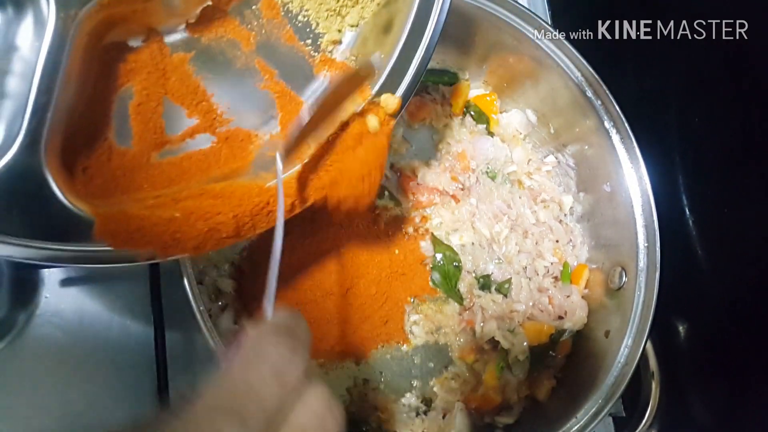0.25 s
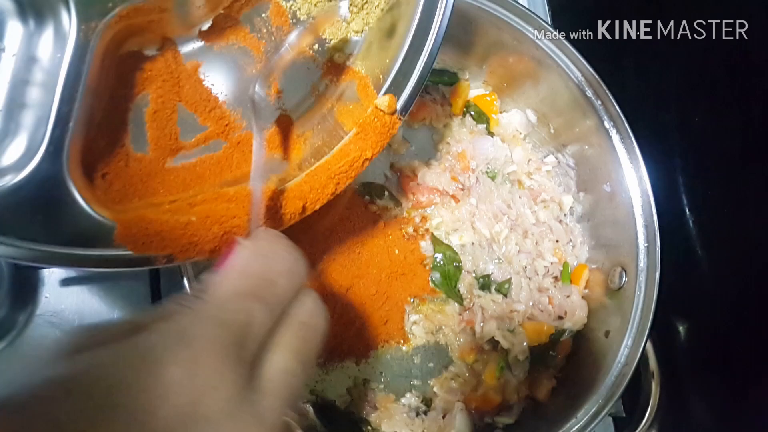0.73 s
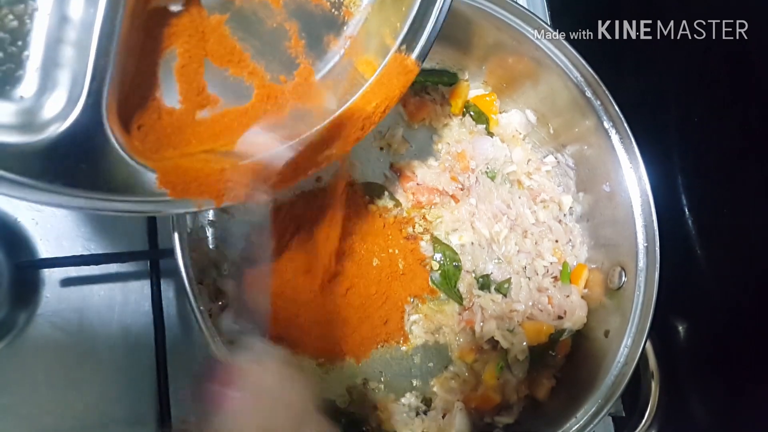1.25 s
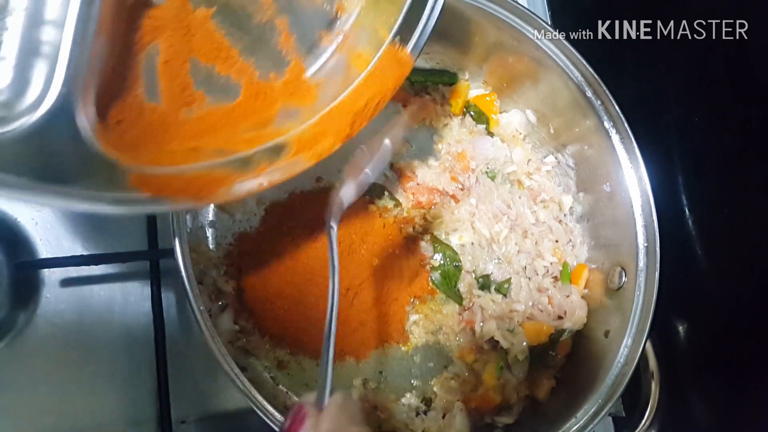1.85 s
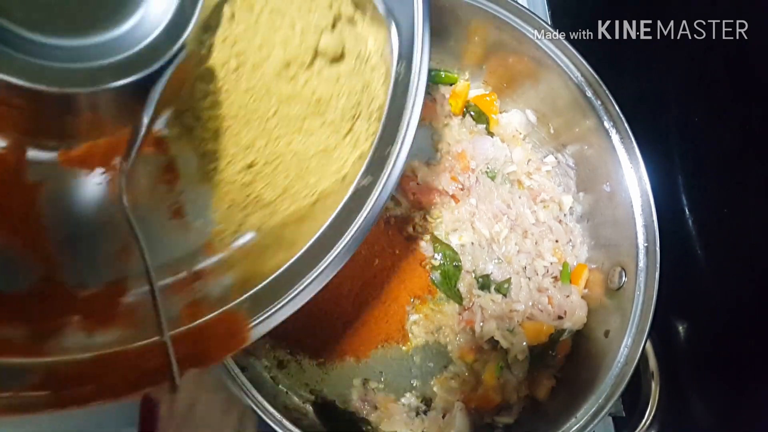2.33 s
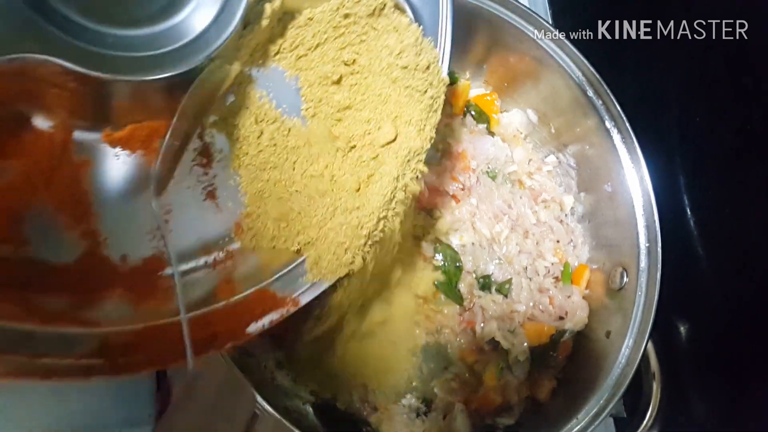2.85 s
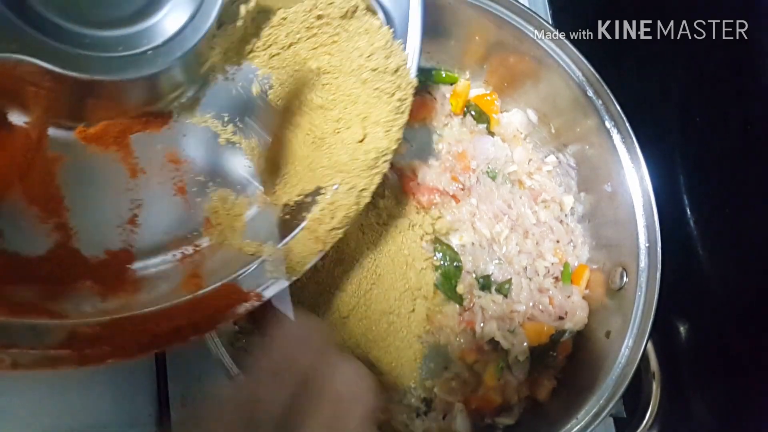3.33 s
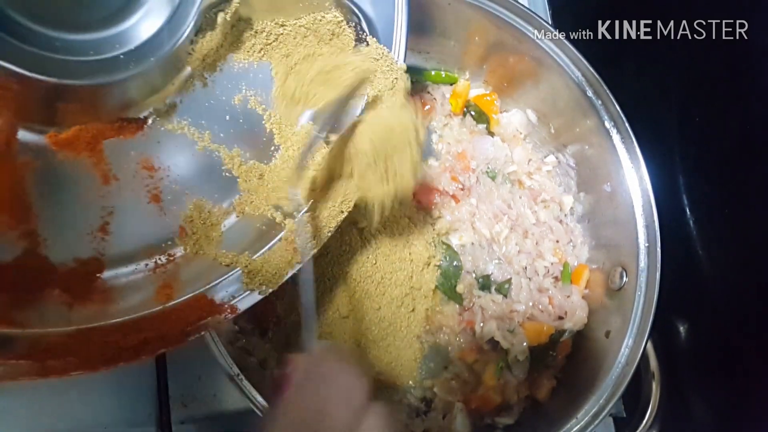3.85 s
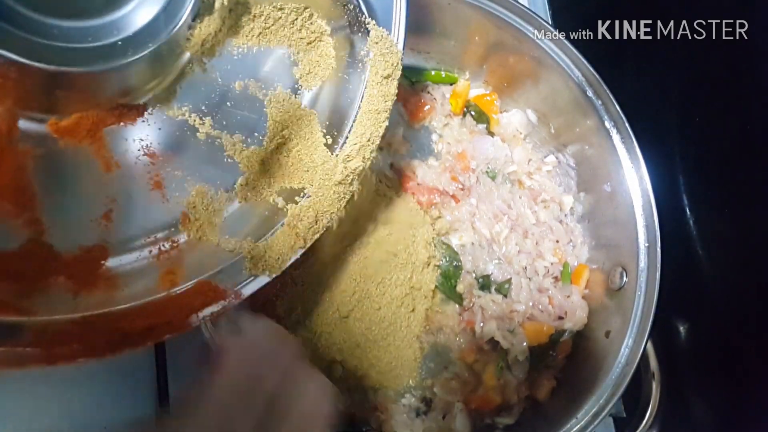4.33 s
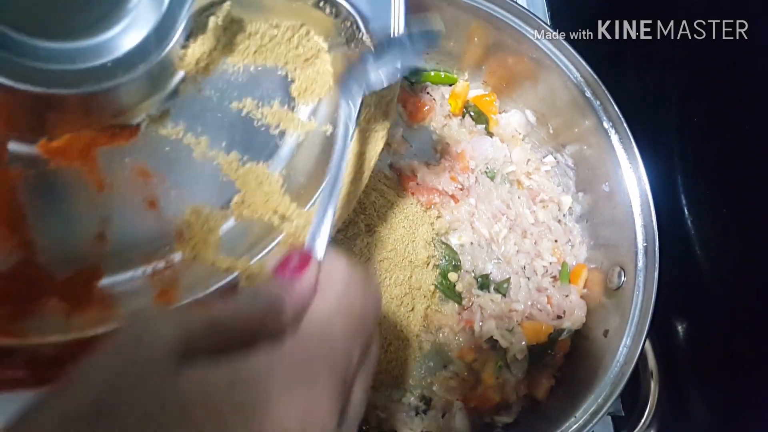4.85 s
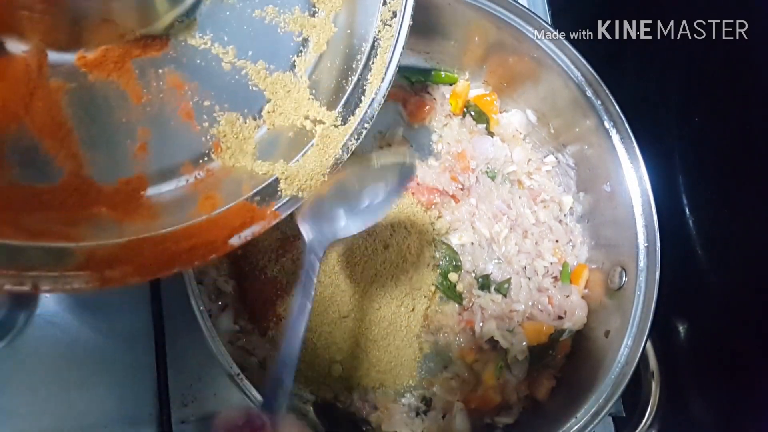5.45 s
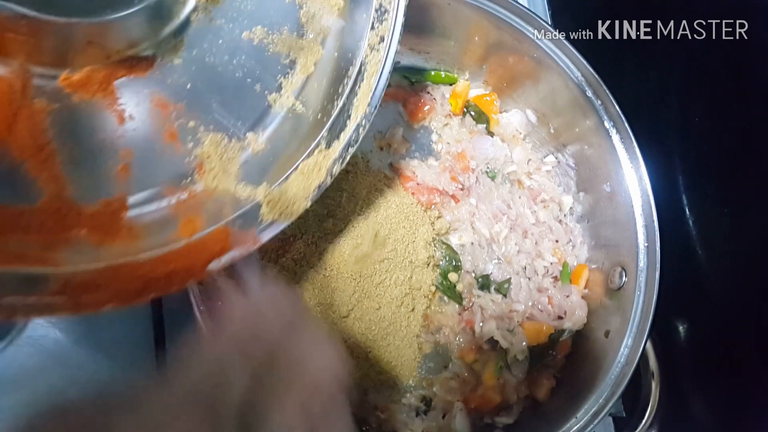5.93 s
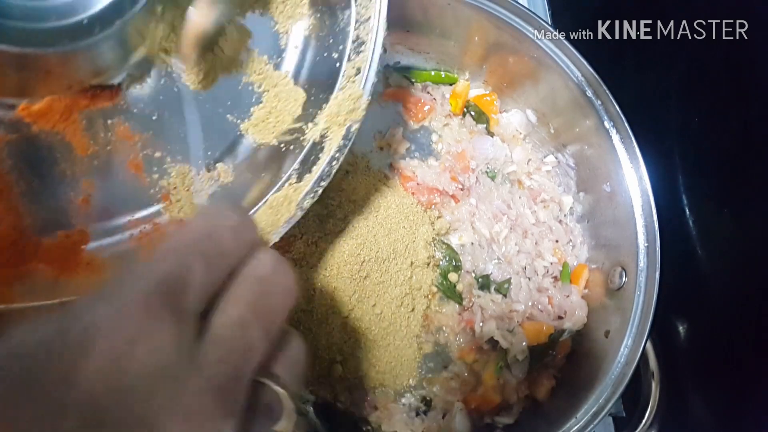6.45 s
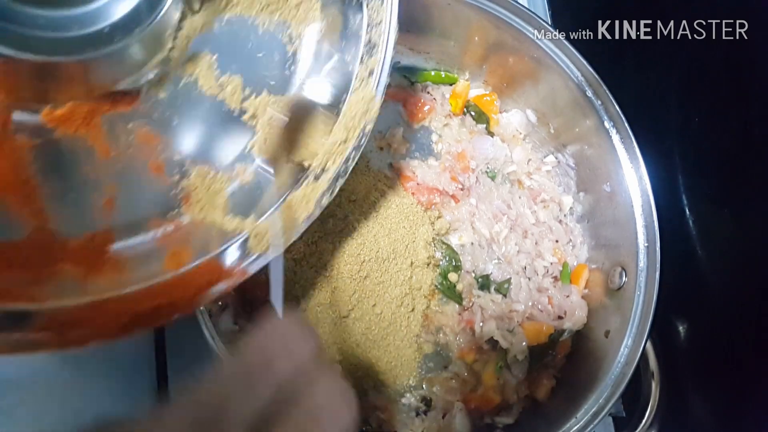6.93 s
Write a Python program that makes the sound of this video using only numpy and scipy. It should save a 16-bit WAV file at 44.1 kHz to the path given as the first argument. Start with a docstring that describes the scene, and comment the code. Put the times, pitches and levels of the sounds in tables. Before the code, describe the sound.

Close up in a small kitchen, a steel spoon works on a thin hand-held plate over quietly sizzling oil. Firm clanks at 0.2 and 0.55 seconds, then a softer one at 0.9, lead to a quick run from 1.2 to 1.85, with bright gritty scrapes and small oil pops around 1.4 to 1.5. From about 2 to 3 seconds it is calmer: the sizzle dips and only faint taps and slides are heard. Softer, duller knocks with powdery hiss follow at 3.0, 3.4 and 3.8. Clear ringing clanks return at 4.15 and, loudest, 4.55, then the plate knocks the pan at 4.67 with a hollow clunk. A longer scrape follows at 5.0. Uneven clinks and short scrapes continue at 5.45, 5.8, 6.2, 6.55 and 6.9, while the sizzle dips again slightly, then rises at the end. Rings are short and hand-damped, the room tail brief, the right side slightly louder.

```python
"""In a small kitchen a steel spoon lands on a hand-held steel plate and scrapes spice powder off it into a pan.
Blows and grit both ring the plate's modes, summed as decaying phasors; fine powder adds a grating noise hiss.
Once the plate knocks the pan. Oil below sizzles as shaped noise with crackle and spits as short pops.
A diffuse tail is the room; two spaced microphone ports hear it all from close by."""
import sys
import numpy as np
from scipy import signal
from scipy.fft import rfft, irfft
from scipy.io import wavfile
from scipy.ndimage import uniform_filter1d

SR = 44100
rng = np.random.default_rng(int(sys.argv[2]) if len(sys.argv) > 2 else 0)


def put_to_file(sound):
    """Save the sound as 16-bit audio at rate SR, in the file named by the first command-line argument."""
    columns = np.atleast_2d(sound).T  # one column per channel
    safe = np.clip(columns, -1, 1)
    whole_steps = np.round(safe * 32767)
    wavfile.write(sys.argv[1], SR, whole_steps.astype(np.int16))


N = 317079

LN_1000 = np.log(1000)  # 60 dB decay in nepers
PORT_SIGNS = np.array([[1], [-1]])  # left, right
PORT_SCATTER_RAD = 0.99  # phase spread at each port from spot to spot, full above 1500 Hz


def undb(db):
    """Amplitude ratio of a level in dB."""
    return 10 ** (np.asarray(db) / 20)


def unit(x):
    """Scales to rms 1."""
    return x / np.sqrt(np.mean(x ** 2))


def along(table, hz):
    """Reads (Hz, value) points on a log-frequency axis."""
    f, v = np.transpose(table)
    return np.interp(np.log(hz + 1), np.log(f), v)


def colour(x, table):
    """Shapes the spectrum by (Hz, dB) points; rms 1."""
    gain = undb(along(table, np.fft.rfftfreq(N, 1 / SR)))
    return unit(irfft(rfft(x) * gain, N))


def walk(rate_hz):
    """Random levels held 1 / rate_hz s and slewed twice."""
    k = int(SR / rate_hz)
    held = np.repeat(rng.standard_normal(N // k + 1), k)
    return 1.3 * uniform_filter1d(uniform_filter1d(held, k), k)[:N]


def grains(density_hz, spread_db):
    """Sparse clicks of scattered size."""
    size_db = spread_db * np.minimum(rng.exponential(size=N), 3)
    hits = rng.random(N) < density_hz / SR
    return hits * rng.standard_normal(N) * undb(size_db)


def add(out, x, s):
    """Mixes x into out from s seconds on."""
    i = int(s * SR)
    out[:, i:i + x.shape[1]] += x[:, :N - i]


def rings(modes, length_s):
    """Decaying phasors of the modes, and how the right port hears each: earlier, treble scrambled."""
    right_lead_s = .0002
    hz, db, t60_s = np.transpose(modes)
    t = np.arange(int(length_s * SR)) / SR
    rate = 2j * np.pi * hz - LN_1000 / np.maximum(t60_s, .01)
    z = undb(db)[:, None] * np.exp(np.outer(rate, t))
    scatter_rad = np.minimum(hz / 2500, 1.6) * rng.standard_normal(len(hz))
    right = np.exp(1j * (2 * np.pi * hz * right_lead_s + scatter_rad))
    return hz, t, z, np.array([np.ones(len(hz)), right])


def spot_phases(hz, ports):
    """Phase turns of each mode at each port, drawn anew for every contact spot."""
    spread_rad = PORT_SCATTER_RAD * np.minimum(hz / 1500, 1)
    return np.exp(1j * spread_rad * rng.standard_normal(ports.shape))


def sizzle():
    """Oil: thin crackle over burner and room noise; the bass is alike at both ports."""
    # noise and crackle colour: (frequency [Hz], gain [dB])
    spectrum = [(20, -24), (50, -18), (100, -6.5), (220, -6), (550, -7), (1400, -9.5), (3300, -9),
                (6300, -11), (7600, -17.5), (11000, -17.5), (16000, -26)]
    # sizzle level over time, sinking by about 7 dB from 2 to 3 s: (time [s], level [dB])
    swell_points = [(0, -43), (1.9, -44.5), (2.1, -51), (2.98, -49.5), (3.1, -43.5), (4.9, -44),
                    (5.3, -47.5), (6.0, -46.5), (7.19, -42.5)]
    # left-right likeness: (frequency [Hz], correlation [0-1])
    likeness = [(130, .97), (250, .94), (500, .75), (1400, .1), (16000, .02)]
    hz = np.fft.rfftfreq(N, 1 / SR)
    like = np.clip(along(likeness, hz), 0, 1)
    bubble = hz / np.hypot(hz, 1500)  # tiny bubbles have no bass

    def source():
        noise = rfft(rng.standard_normal(N))
        return noise + .5 * bubble * rfft(unit(grains(300, 5.0)))

    mid, side = source(), source()
    pair = irfft(mid * np.sqrt(1 + like) + side * np.sqrt(1 - like) * PORT_SIGNS, N)
    s, db = np.transpose(swell_points)
    swell_db = np.interp(np.arange(N) / SR, s, db) + 1.0 * walk(8.1)
    return colour(pair, spectrum) * undb(swell_db)


def plate_modes():
    """The plate's strong modes plus a crowd of weak, quickly damped ones: (Hz, dB, free t60 s)."""
    # strong modes: (frequency [Hz])
    strong_hz = [887, 1124, 1230, 1385, 1464, 1556, 1666, 1814, 1963, 2266, 2342, 2572, 2885, 2968, 3127,
                 3288, 3517, 3747, 3850, 4135, 4581, 5160, 5669, 6309, 7219]
    # strong modes: (level [dB])
    strong_db = [-11, -9.5, -13.5, -11.5, -14.5, -17, -11, -10, -12.5, -9, -8.5, -8.5, -16, -6, -15.5, -11,
                 -9.5, -8, -17, -20, -10, -11.5, -11, -13.5, -21]
    strong_t60_s, crowd_t60_s, crowd = .3, .13, 70
    hz = 450 + 9000 * np.linspace(0, 1, num=crowd) ** 1.3 * (1 + 0.0073 * rng.standard_normal(crowd))
    db = along([(450, -31.5), (850, -15.5), (1300, -15.5), (3500, -12.5), (9500, -29)], hz)
    db = db + 2 * rng.standard_normal(crowd)
    strong = np.c_[strong_hz, strong_db, np.full(len(strong_hz), strong_t60_s)]
    return np.r_[strong, np.c_[hz, db, np.full(crowd, crowd_t60_s)]]


def blows(modes):
    """Each landing spot feeds the modes differently; the grip and the powder shorten the ring."""
    # spoon landings; colours are against the blow: (time [s], blow level [dB], lowest mode [dB],
    # brightness at 3 kHz [dB], thud [dB], ring length [share])
    landings = [(0.1904, -11, 4, -12, -9.5, 0.28), (0.5443, -10.5, 10.5, -7, -6, 0.5),
                (0.9158, -22, 18.5, -10, -0.5, 0.52), (1.2236, -14, 8.5, -9, -4.5, 0.58),
                (1.2563, -10.5, -1, -11.5, -15.5, 0.45), (1.5234, -11.5, 4.5, -12.5, -18, 0.49),
                (1.6108, -15, -20, -10, -15, 0.22), (1.8471, -10.5, 1.5, -0.5, -16, 0.75),
                (2.4464, -30, -17, 3, -11, 0.34), (3.0255, -19.5, 14, -14, 1.5, 0.26),
                (3.3978, -20.5, 9, -23, 3, 0.25), (3.7794, -27, -1.5, -11, 3, 0.91),
                (4.14, -11, 1, -11, -6.5, 0.7), (4.5423, -7.5, -3.5, -10, -8.5, 1),
                (4.9757, -12.5, -2, -5.5, -12, 0.76), (5.447, -22.5, 1, 1.5, -3.5, 0.3),
                (5.7954, -13, 6.5, -10.5, -6.5, 0.41), (6.1923, -22, -4, -15, -1.5, 0.24),
                (6.551, -14.5, -2.5, -12, 0, 0.49), (6.65, -22.5, -11, -12, -5.5, 0.43),
                (6.9048, -18, -18, 8, -2.5, 0.83)]
    treble_drop_db, tick_db = -5, -15  # 6 kHz modes and the tick, against the brightness
    out = np.zeros((2, N))
    hz, t, z, ports = rings(modes, 0.41)
    thud = np.exp(-t / 0.0019) * np.sin(2 * np.pi * 380 * t)
    for s, db, low_db, bright_db, thud_db, share in landings:
        tone_points = [(1300, 0.79), (2000, -2.7), (3000, bright_db), (6000, bright_db + treble_drop_db)]
        tone_db = along(tone_points, hz) + 3.4 * rng.standard_normal(len(hz))
        tone_db[0] = low_db
        feed = undb(tone_db) * spot_phases(hz, ports) * ports
        grip = np.exp(-LN_1000 * t / 0.2 * (1 / np.clip(share, .15, 3) - 1 / 3))
        lowest = np.outer(feed[:, 0], z[0]).imag * np.sqrt(grip)  # the fingers hold it near a node
        higher = (feed[:, 1:] @ z[1:]).imag * grip
        ring = (higher + lowest) * np.minimum(t / .0006, 1)
        # steel edge on steel
        tick = np.diff(rng.standard_normal((2, len(t) + 1))) * np.exp(-t / 0.0043)
        blow = undb(db) * ring + undb(db + thud_db) * thud
        add(out, blow + undb(db + bright_db + tick_db) * tick, s)
    return out


def strokes(modes):
    """Grit under the edge drives the plate, other modes as the contact travels; fine powder hisses."""
    # spoon slides; thin steel near the rim rings higher: (start [s], time until lift [s],
    # scrape at start [dB], scrape at lift [dB], powder hiss at lift [dB], tilt [dB/octave],
    # favoured modes [Hz], their gain [dB])
    slides = [(0.56, 0.05, -27, -28.5, -35.5, -1, 890, 7.8), (0.93, 0.084, -42, -37, -37, -3.5, 3150, 7),
              (1.27, 0.042, -23.5, -27.5, -34, -4, 1500, 4),
              (1.54, 0.077, -24.5, -24, -34.5, -3.5, 1720, 6),
              (1.86, 0.053, -21, -20.5, -36.5, -0.5, 3170, 4),
              (2.47, 0.12, -57, -42, -53, -1.5, 2200, 11.6),
              (2.63, 0.066, -41.5, -37.5, -40, 2.5, 3800, 5.3),
              (3.042, .058, -35.5, -33.5, -31.5, -3.5, 4460, 3.5),
              (3.408, 0.074, -37.5, -39, -56, -9, 1250, 9), (3.79, 0.016, -31, -34, -34, -6, 3120, 3.5),
              (3.86, 0.05, -42, -38.5, -46, -2.5, 3080, 4.8),
              (4.16, 0.092, -24, -30.5, -28, -1.3, 2270, 5.9),
              (4.299, 0.047, -38, -34, -37.5, -0.5, 3060, 6.5),
              (4.559, 0.055, -22, -28.5, -26.5, -1, 3820, 4.1), (4.99, .16, -22, -32, -32, 0, 3220, 5.9),
              (5.458, 0.093, -28.5, -34, -36.5, -1, 3190, 13), (5.808, 0.068, -28, -35, -30, -1, 1250, 11),
              (6.2, 0.021, -28, -34.5, -30, -2.5, 2380, 5.8),
              (6.569, 0.097, -27, -48, -40, -3.5, 1320, 5.2),
              (6.921, .045, -23.5, -26.5, -41, 0, 3020, 9.1)]
    # powder grain colour: (frequency [Hz], gain [dB])
    powder = [(300, -45), (2000, -19), (5500, -5.5), (7700, -16), (10900, -13.5), (16000, -29)]
    # the edge bites, then leaves the plate
    touch_s, lift_db_per_s, hiss_lift_db_per_s = .015, 269, 370
    hiss_growth_db = 8.5  # the hiss grows as the spoon gathers speed and powder
    grate_s = 0.0038  # decay of the small patch under the edge
    out = np.zeros((2, N))
    hz, t, z, ports = rings(modes, .2)
    grit = undb(2.23 * walk(60)) * unit(grains(2500, 4.1))
    dust = undb(2.94 * walk(90)) * np.array([colour(grains(3500, 4.8), powder) for _ in range(2)])
    for s, length_s, start_db, lift_db, hiss_db, tilt_db, sings_hz, favour_db in slides:
        now = np.arange(-touch_s, length_s + .12, 1 / SR)
        before, after = np.maximum(length_s - now, 0), np.maximum(now - length_s, 0)
        touch = np.minimum(1 + now / touch_s, 1)
        span = slice(int(s * SR), int(s * SR) + len(now))
        scrape_db = lift_db + (start_db - lift_db) * before / length_s - lift_db_per_s * after
        dust_db = hiss_db - hiss_growth_db * before / length_s - hiss_lift_db_per_s * after
        drive = touch * undb(scrape_db) * grit[span]
        hiss = touch * undb(dust_db) * dust[:, span]
        favoured = np.exp(-(np.log2(hz / sings_hz) / 0.13) ** 2)
        path_db = tilt_db * np.log2(hz / 2000) + favour_db * favoured
        # four contact places, crossfaded at equal power
        travel = np.minimum(np.arange(len(now)) / SR / (length_s + .06), 1) * 3
        for place in range(4):
            spot = undb(path_db + 2.56 * rng.standard_normal(len(hz)))
            spot = spot * np.exp(2j * np.pi * rng.random(len(hz)))
            turned = ports * spot_phases(hz, ports)
            body = ((spot * turned) @ z).imag * np.exp(-t / 0.012)  # the pressing spoon damps the plate
            patch = rng.standard_normal((2, len(t))) * np.exp(-t / grate_s)
            here = np.sqrt(np.maximum(1 - np.abs(travel - place), 0))
            for push, ring in (((drive * here)[None], body), (hiss * here, patch)):
                response = ring / np.sqrt(np.mean(ring ** 2) * len(t))  # unit energy
                add(out, signal.fftconvolve(push, response, axes=1), s - touch_s)
    return out


def spits():
    """Single drops bursting in the oil: a decaying sine each, a cycle or two long."""
    # bursts: (time [s], level [dB])
    drops = [(1.4164, -23.5), (1.4694, -24.5), (1.506, -21), (2.9446, -31), (3.2169, -22), (3.883, -24.5),
             (4.8045, -31), (5.3543, -28), (6.0723, -27.5)]
    out, t = np.zeros((2, N)), np.arange(300) / SR
    for s, db in drops:
        size, side = rng.standard_normal(2)
        pop_hz = 3300 * np.exp(.2 * size)
        pop = np.exp(-t / .0005) * np.sin(2 * np.pi * pop_hz * t)
        add(out, undb(db + 2 * side * PORT_SIGNS) * pop, s)
    return out


def pan_knock():
    """The plate's rim touches the pan and rings the pan's modes."""
    # pan modes: (frequency [Hz], level [dB], t60 [s])
    pan = [(215, -26, 0.57), (248, -29.5, 0.86), (500, -6.5, 0.035), (710, -20, 0.21), (804, -9, 0.093),
           (978, -8.5, 0.086), (1790, -12, 0.14)]
    # knocks: (time [s], level [dB])
    knocks = [(4.665, -14)]
    out = np.zeros((2, N))
    _, _, z, ports = rings(pan, 0.36)
    for s, db in knocks:
        add(out, undb(db) * (ports @ z).imag, s)
    return out


def kitchen(x):
    """Room echo: a short diffuse tail of decaying noise, different at each port."""
    t60_s, gap_s = .3, .003
    t = np.arange(int(.5 * SR)) / SR
    tail = rng.standard_normal((2, len(t))) * np.exp(-LN_1000 * t / t60_s) * (t > gap_s)
    tail = signal.lfilter([.5], [1, -.5], tail)  # softer treble
    return signal.fftconvolve(x, tail / np.sqrt(np.sum(tail[0] ** 2)), axes=1)[:, :N]


def scene():
    """Sums the near sources, their room tail and the sizzle."""
    room_db = -14
    modes = plate_modes()
    near = blows(modes) + strokes(modes) + spits() + pan_knock()
    # small, thin objects radiate little bass
    near = signal.sosfilt(signal.butter(2, 130, "highpass", fs=SR, output="sos"), near)
    return near + undb(room_db) * kitchen(near) + sizzle()


def record(dry):
    """The right port is the louder; tanh rounds the loudest peaks and a steep low-pass cuts the top."""
    right_over_left_db, top_hz = 2.0, 15900
    heard = dry * undb(-PORT_SIGNS * right_over_left_db / 2)
    rounded = np.tanh(0.94 * heard) / 0.72
    return signal.sosfilt(signal.ellip(10, .2, 70, top_hz, fs=SR, output="sos"), rounded)


dry = scene()
out = record(dry)
put_to_file(out)
```